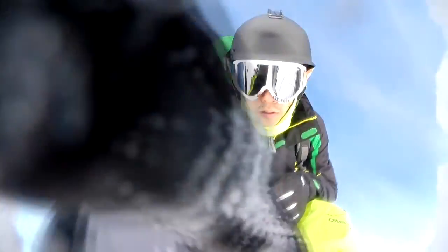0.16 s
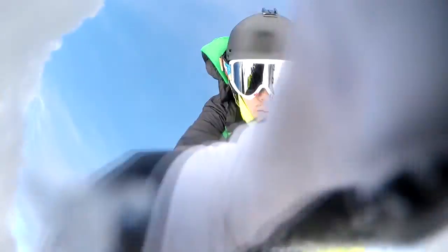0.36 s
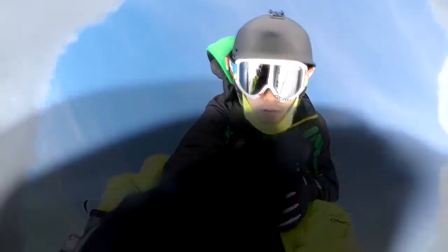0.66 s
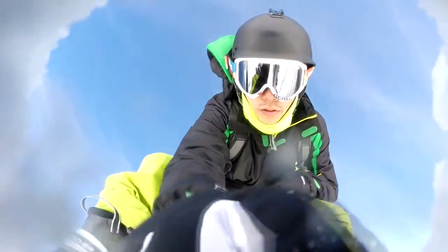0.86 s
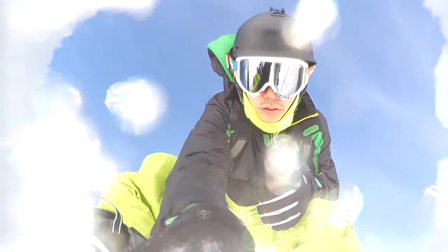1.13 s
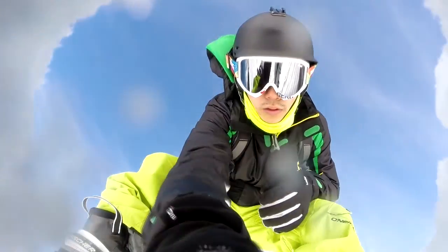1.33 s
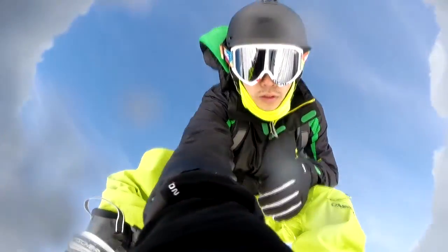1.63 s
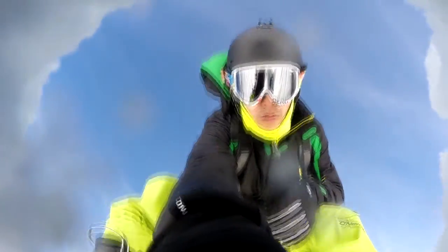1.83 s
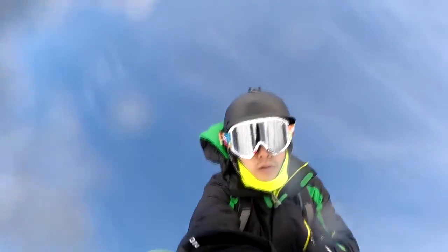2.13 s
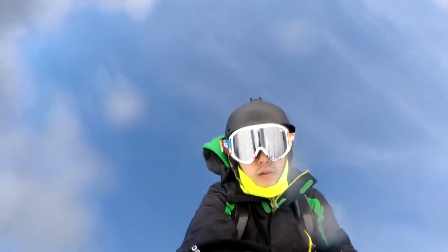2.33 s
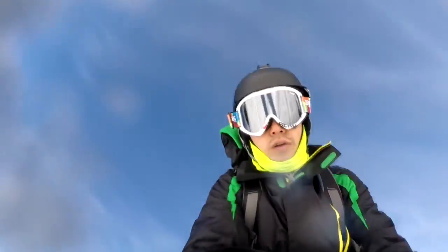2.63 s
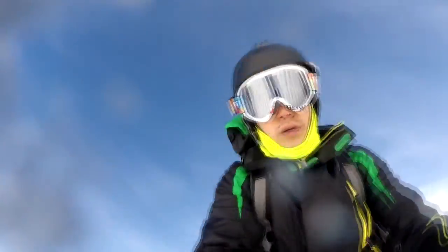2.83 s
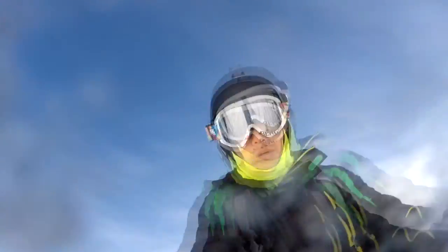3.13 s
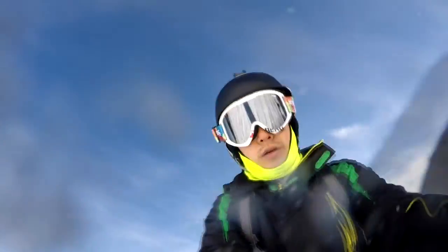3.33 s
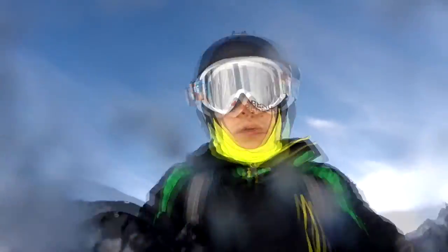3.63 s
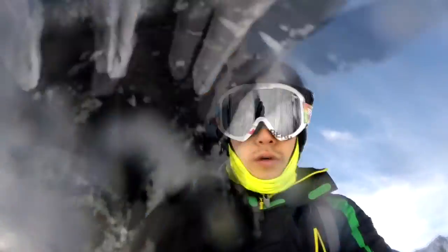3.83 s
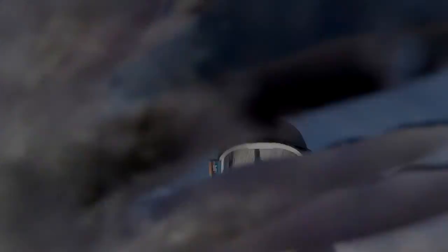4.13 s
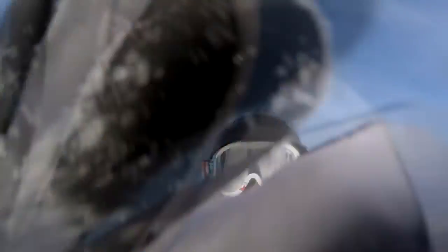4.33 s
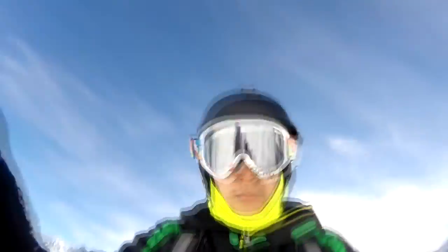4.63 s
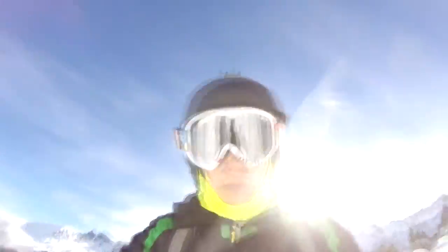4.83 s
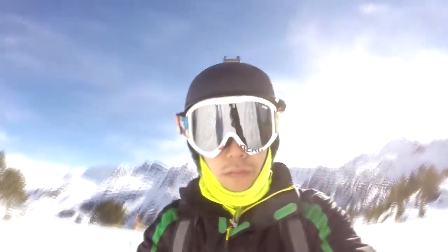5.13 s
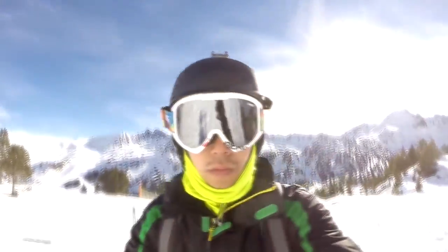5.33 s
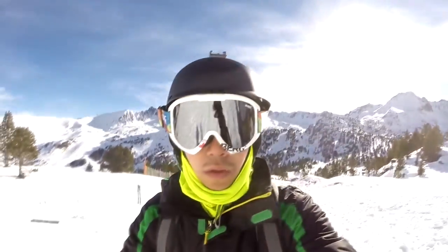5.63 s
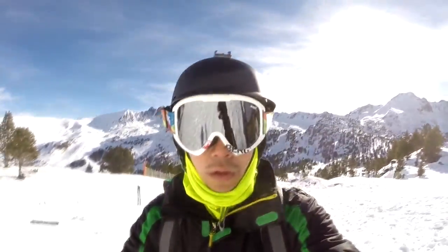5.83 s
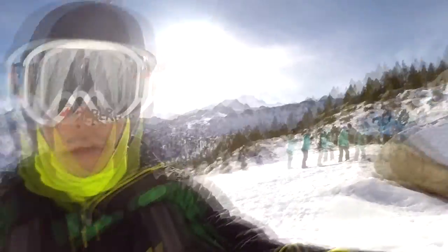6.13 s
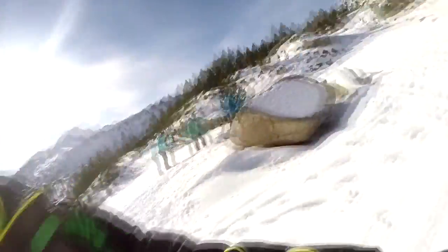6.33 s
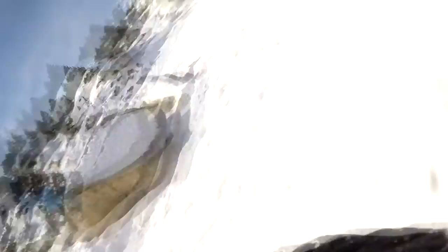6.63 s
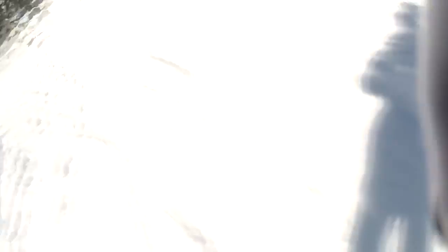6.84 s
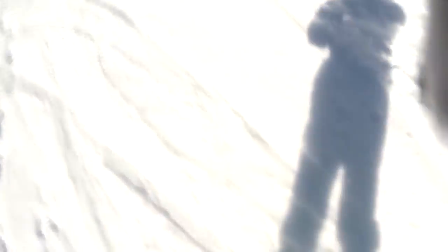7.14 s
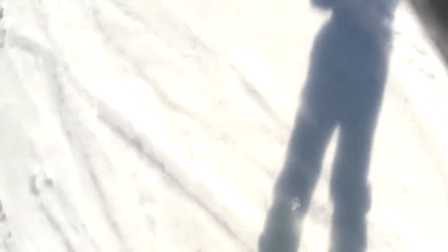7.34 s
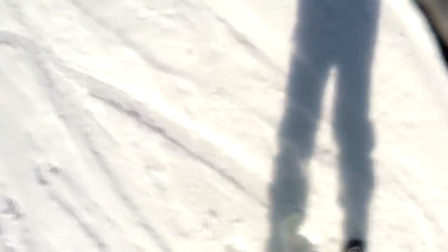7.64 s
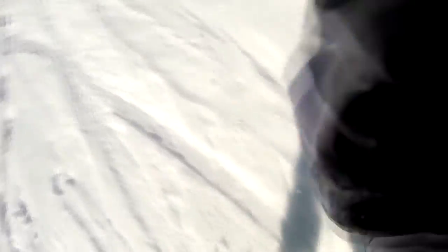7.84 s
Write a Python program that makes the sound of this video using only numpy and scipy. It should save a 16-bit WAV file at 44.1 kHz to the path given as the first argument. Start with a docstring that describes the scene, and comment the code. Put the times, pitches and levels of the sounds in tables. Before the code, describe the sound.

A microphone sealed in a plastic housing picks up a gloved hand very closely on a still, snowy slope. From 0 to 1.1 s short, rough wipes scrape and crunch over icy grains, with snaps, dull knocks, low bumps and tiny squeaks around 0.6 s. After a brief easing, a heavy thump and more strokes come at 1.5 s, running to about 2.1 s and ending in bright ticks. A lull follows; at 2.5-2.9 s the mount creaks in small slipping pulses. Crisp scraping resumes from 2.9 s, growing knockier and more cracking, with deep bumps between 3.7 and 4.9 s. Near 5 s it falls almost silent, just faint air and a thin wavering whine, then a slight swell. From 5.9 s snaps and scrapes return; after 6.6 s the case rings hollowly, with sharp strokes near 7.2-7.4 s and strong final scrapes around 7.8 s, over low arm-swing rumble.

```python
"""A skier wipes snow off a camera in a plastic housing with a glove, lifts it, then turns it round in the hand.
Rough strokes scrape from the start, shaped noise over snow-like grains, among ringing ice snaps, bumps and squeaks.
After a lull near 2.3 s slipping pulses creak, the strokes return, and a second lull near 5 s ends in a faint swell.
From about 6 s the last strokes scrape, and the case modes ring more freely.
Low noise rumbles with the swinging arm; faint air noise and two thin wavering tones lie beneath."""
import sys
import numpy as np
from scipy import signal
from scipy.fft import rfft, irfft, next_fast_len
from scipy.io import wavfile
from scipy.ndimage import uniform_filter1d, map_coordinates

SR = 44100
rng = np.random.default_rng(int(sys.argv[2]) if len(sys.argv) > 2 else 0)


def to_wav(sig):
    """Store sig (one row per channel, or 1-D mono) as 16-bit WAV at the path in sys.argv[1].

    Samples outside -1..1 are clipped; the rate is SR.
    """
    pcm = np.clip(np.atleast_2d(sig), -1, 1) * 32767
    pcm = np.round(pcm).astype(np.int16)
    wavfile.write(sys.argv[1], SR, pcm.T)  # frames by channels


N = 351477  # length in samples

# Colour of the housing's walls under scraping and crunching.
# Each row: frequency in Hz, relative level in dB.
WALL_COLOUR = [(450, -42.5), (800, -11), (1050, -11), (1350, 1.5), (1750, 1.5), (2100, 3), (2650, 0),
               (3400, -8.5), (4500, -38), (7000, -38.5)]
# Colour of the bright ice hiss and the cracks.
# Each row: frequency in Hz, relative level in dB.
ICE_COLOUR = [(1800, -35), (3000, -2), (3800, 1), (4900, -1), (5900, 2), (7500, -8.5), (8600, -8.5),
              (9800, -10.5), (11500, -15.5), (15000, -25)]


def amp(db):
    """Decibels to gain."""
    return 10 ** (np.asarray(db) / 20)


def unit(x):
    """Scale to rms 1."""
    return x / np.sqrt(np.mean(x ** 2) + 1e-20)


def curves(rows):
    """One value per sample for each column after the time."""
    s, *cols = np.transpose(rows)
    return [np.interp(np.arange(N) / SR, s, c) for c in cols]


def wobble(rate):
    """A smooth random curve, rate knots a second."""
    knots = rng.standard_normal(int(N * rate / SR) + 4)
    return map_coordinates(knots, [np.arange(N) * rate / SR], mode="nearest")


def coloured(x, points):
    """x through a causal minimum-phase filter of power gain 1 with the (Hz, dB) shape."""
    m = 2 * next_fast_len(N // 2 + SR // 8)
    hz, db = np.transpose(points)
    bin_hz = np.fft.rfftfreq(m, 1 / SR)
    gain = unit(amp(np.interp(np.log(bin_hz + 1), np.log(hz), db)))
    # folding the cepstrum onto positive time makes the filter causal
    cepstrum = irfft(np.log(gain))
    cepstrum[1:m // 2] *= 2
    cepstrum[m // 2 + 1:] = 0
    return irfft(rfft(x, m) * np.exp(rfft(cepstrum)))[:N]


def add(track, s, sound):
    """Mix a sound into the track from time s."""
    start = max(0, round(s * SR))
    part = track[start:start + len(sound)]
    part += sound[:len(part)]


def touch_db(start, end, land, lift):
    """0 dB from start to end, falling away before and after at the given dB a second."""
    t = np.arange(N) / SR
    return np.clip(np.minimum(land * (t - start), lift * (end - t)), -150, 0)


def press_db(s, rise, fall):
    """The level of one stroke, as of a glove that lands, bears down, eases off and lifts."""
    swell_db, ease_db = 10.5, 8.5  # gained over the rise, lost over the fall
    land_db_per_s, lift_db_per_s = 5003.5, 1798.5
    t = np.arange(N) / SR - s
    below_peak = swell_db * np.clip(-t / rise, 0, 1) + ease_db * np.clip(t / fall, 0, 1)
    return touch_db(s - rise, s + fall, land_db_per_s, lift_db_per_s) - below_peak


def handling():
    """All strokes and grips together: levels of scrape, hiss, rub and judder (dB), and favoured resonance (Hz)."""
    # Wipes of the glove, and one faint swell of background noise before 5.9 s.
    # Each row: loudest moment in seconds, rise in seconds, fall in seconds, scrape in dB,
    # then hiss, rub and judder in dB relative to the scrape, and the resonance favoured in Hz.
    strokes = [(0.071, 0.051, .01, -24, -6.5, 0.5, 1, 2290), (0.127, .04, 0.032, -39, -7.5, -10, 4, 2022),
               (0.27, .026, 0.011, -13, -12, -11.5, -10, 1868),
               (.345, 0.083, 0.034, -35.5, -4.5, -2, 10.5, 2030),
               (0.484, 0.027, 0.01, -20.5, -3, 0.5, 0.5, 2230), (.525, 0.011, .02, -33, -9, -1, 3.5, 2200),
               (0.631, 0.036, .025, -26.5, -12, -8, 6, 1940),
               (0.658, .006, 0.0034, -32, -28, 15, 2.5, 1778),
               (0.723, 0.016, 0.0046, -16.5, -6.5, -5, 3, 1694),
               (0.761, 0.026, .025, -43, -4.5, 10.5, 17, 1836), (.825, .016, .006, -33, -10, -2, 6.5, 1782),
               (0.859, .03, .018, -19, -13, -9, 3, 1756), (0.898, 0.022, .015, -35.5, -6, 1, 15.5, 1800),
               (0.981, .055, 0.013, -31.5, -7, -1.5, -2, 1820),
               (1.084, 0.033, 0.0087, -32, -8.5, 0.5, 6.5, 1840),
               (1.375, .01, .03, -50, -22, -9, -16, 2235), (1.48, 0.072, .012, -65.5, -14.5, 18, -1, 1192),
               (1.555, 0.054, 0.028, -19, -8, -3, -2.5, 1980), (1.594, .006, .01, -21, -12, -5.5, 6, 1750),
               (1.706, 0.033, .03, -28, -7, -0.5, 9.5, 1980),
               (1.83, 0.08, 0.067, -24.5, -14.5, -8, -0.5, 2094),
               (1.96, .085, 0.057, -20.5, -7.5, -13.5, -22, 2080),
               (2.051, .006, 0.057, -29, -12, -28.5, -31, 3400), (2.841, 0.027, .02, -51, -18, 5, 3, 1935),
               (2.902, 0.036, 0.0096, -25, -9, -14, -23, 1924),
               (3.021, .055, 0.021, -21, -8, -16.5, -12, 1935),
               (3.114, 0.062, 0.021, -17, -6, -22.5, -17, 2070),
               (3.168, 0.059, 0.046, -23, -6.5, -17, -3.5, 2103),
               (3.254, 0.021, 0.022, -28, -12, -36, -35, 2232),
               (3.326, 0.0096, 0.025, -34, -7.5, -30, -31, 2173),
               (3.395, .003, 0.063, -23.5, 2.5, -12, -7, 4260),
               (3.465, 0.027, .045, -20.5, -8, -11, -8.5, 2060),
               (3.56, 0.075, 0.11, -34.5, -7.5, -3.5, -13.5, 2018),
               (3.73, 0.048, 0.025, -20.5, -6.5, -2.5, -8, 1750),
               (3.788, 0.012, 0.025, -28.5, -2.5, -4.5, 2.5, 1817),
               (3.932, 0.0083, .02, -17, 4, -11.5, -6, 1508),
               (3.975, 0.025, 0.0094, -19.5, -1.5, -4, -1, 1560),
               (4.18, .003, .012, -28.5, -8, -4, 5.5, 2100), (4.208, .016, 0.014, -23, 1, -5.5, -0.5, 3870),
               (4.24, .015, 0.0091, -20.5, -10, -5.5, 1.5, 1556),
               (4.301, 0.049, 0.073, -55.5, -1.5, -16.5, -19.5, 1715),
               (4.409, .002, .012, -33, -8, 7, 12.5, 1750), (4.457, .04, 0.007, -21, -8.5, -4.5, 3.5, 1720),
               (4.662, 0.05, 0.016, -22.5, -7.5, -2.5, 6.5, 1837),
               (4.69, .01, 0.03, -38.5, -5.5, -5, -2, 1970),
               (4.823, .002, 0.014, -28.5, -7.5, 6.5, -0.5, 2286),
               (4.852, 0.0023, 0.0033, -17, -15.5, 7, 7, 2485),
               (4.94, .07, .06, -53, -10.5, -3.5, -12.5, 1948), (5.86, .35, .06, -69, 4, 7, 5, 1800),
               (5.965, .015, 0.0099, -28.5, -14.5, 3.5, 4.5, 2073),
               (6.044, 0.12, 0.094, -23, -12.5, -12, -9, 2395),
               (6.188, 0.016, 0.017, -29.5, -6.5, -8, -5, 2380),
               (6.23, 0.022, .035, -31, -12, -10, -13, 2176),
               (6.328, 0.011, 0.015, -20, -6.5, -11, -2.5, 2270),
               (6.47, .11, 0.11, -24.5, -5, -11.5, -4, 2050), (6.631, .03, 0.024, -33.5, -12, -2, 10, 2014),
               (6.743, .055, 0.068, -24, -10, -6, -6, 2090), (6.848, .04, 0.15, -34, -8.5, -8, -7, 1966),
               (7.213, 0.022, .02, -20.5, -8, -17, -15, 1966),
               (7.289, 0.069, 0.075, -28, -2, -6.5, -2.5, 1744),
               (7.415, .012, 0.017, -20, -5.5, 2.5, -9.5, 1502),
               (7.44, 0.013, .022, -22.5, -8.5, 2, -0.5, 1302),
               (7.519, 0.11, 0.28, -35.5, -5.5, -9.5, -4.5, 1910),
               (7.825, 0.06, 0.03, -15.5, -8.5, -17, -19.5, 2080),
               (7.872, .012, 0.014, -14, -17, -12.5, -11.5, 2150),
               (7.91, .02, .03, -28.5, -16, -14, -7, 1996), (7.96, .015, .02, -30, 0, -17, -16, 4460)]
    # The glove resting on the case and creeping between wipes.
    # Each row: start in seconds, end in seconds, levels of scrape, hiss, rub and judder in dB.
    grips = [(0, 0.162, -50, -57, -47, -41), (0.219, 1.027, -46.5, -54.5, -50, -46),
             (1.307, 1.493, -59.5, -78, -55, -72), (1.496, 1.722, -49, -52.5, -52, -44),
             (1.717, 2.121, -37, -42.5, -59, -65), (2.536, 2.843, -65, -71, -63, -64),
             (2.837, 3.389, -49, -54.5, -56, -56), (3.39, 4.25, -51, -59.5, -52.5, -55),
             (4.612, 4.715, -51.5, -57, -56, -48.5), (4.714, 4.821, -62.5, -74, -62.5, -72.5),
             (5.918, 6.326, -41.5, -56, -56, -47.5), (6.33, 6.67, -34.5, -42.5, -42.5, -41.5),
             (6.697, 7.975, -38, -45.5, -47.5, -45)]
    # Nothing sliding on the case: levels of scrape, hiss, rub and judder in dB.
    idle = (-81, -82.5, -81, -74.5)
    grip_db_per_s = 899.5  # a grip closes and loosens more gently than a wipe

    power = amp(idle)[:, None] ** 2 * np.ones(N)
    for start, end, *grip_db in grips:
        grip = amp(touch_db(start, end, grip_db_per_s, grip_db_per_s)) ** 2
        power += np.outer(amp(grip_db) ** 2, grip)
    weight, weighted_hz = np.zeros((2, N))
    for s, rise, fall, db, hiss_db, rub_db, judder_db, hz in strokes:
        stroke = amp(db + press_db(s, rise, fall)) ** 2
        power += np.outer(amp([0, hiss_db, rub_db, judder_db]) ** 2, stroke)
        weight += stroke
        weighted_hz += hz * stroke
    return 10 * np.log10(power), weighted_hz / weight


def grains(rate, spread_db):
    """Tiny fractures at random moments, of scattered sizes; the power is the same at every rate."""
    sizes = amp(spread_db * np.clip(rng.standard_normal(N), -2, 2)) * rng.choice([-1, 1], N)
    breaks = rng.random(N) < rate / SR
    return unit(sizes * breaks / np.sqrt(rate))


def shifting(x, contact_hz, depth_db, lift_db):
    """The colour drifts in patches, and one resonance stands out, as the contact moves over the case."""
    hz, s, z = signal.stft(x, SR, nperseg=256)
    patches = rng.standard_normal(z.shape)
    for _ in range(2):
        patches = uniform_filter1d(patches, 5, axis=0)  # over frequency
        patches = uniform_filter1d(patches, 9, axis=1)  # over time
    resonance_hz = np.interp(s, np.arange(N) / SR, contact_hz)
    octaves = np.log2((hz[:, None] + 1) / resonance_hz)
    db = depth_db * unit(patches) + lift_db * np.exp(-(octaves / 0.38) ** 2)
    return signal.istft(z * amp(db), nperseg=256)[1][:N]


def padded(x):
    """The hollow between glove and case adds a low resonance that moves as the grip changes."""
    # Each row: time in seconds, resonance in Hz.
    hollow = [(0, 257.3), (.55, 298.4), (.66, 496), (.75, 280), (1.1, 279.4), (1.47, 623), (1.6, 321),
              (2.85, 299.5), (3.3, 708), (4.15, 848), (4.85, 619), (6.1, 593), (6.8, 304.3), (7.42, 444)]
    width_hz, gain = 170, 0.71
    # shift the moving resonance down to 0 Hz, smooth there, and shift it back
    turn = np.exp(2j * np.pi * np.cumsum(curves(hollow)[0]) / SR)
    keep = np.exp(-np.pi * width_hz / SR)
    boom = turn * signal.lfilter([1 - keep], [1, -keep], x / turn)
    return x + gain * 2 * np.real(boom)


def scraping(levels_db, contact_hz):
    """Snow crystals catch and slip in clumps under the glove and shake the housing."""
    # Dull rub of the glove. Each row: frequency in Hz, relative level in dB.
    rub_colour = [(90, -28.5), (170, 1), (280, -0.5), (370, -4.5), (450, -4.5), (560, -8.5), (700, -9),
                  (880, -7), (1400, -13), (3000, -73)]
    # Shudder of the dragged case. Each row: frequency in Hz, relative level in dB.
    judder_colour = [(25, -17.5), (50, -1.5), (80, 0), (130, -5), (190, -10.5), (300, -29.5), (600, -67.5)]
    clump_db, catch = 1.5, 0.077  # unevenness, and its growth per dB of judder as the glove catches

    scrape_db, hiss_db, rub_db, judder_db = levels_db
    catching = 1 + catch * np.clip(judder_db - scrape_db + 8.5, -12, 12)
    clumps = amp(clump_db * catching * (0.95 * wobble(rate=200) + 0.23 * wobble(rate=88)))
    # a light touch breaks single crystals; a hard stroke breaks so many that they merge
    crunch = grains(rate=1700 * amp(.5 * (np.maximum(scrape_db, -62) + 20)), spread_db=4.5)
    # the lightest touch breaks none and only whispers
    bite = np.interp(scrape_db, [-73, -60], [0, 1])

    def friction(smooth):
        """Breaking crystals over smooth noise, both gathered in clumps."""
        whisper = (smooth + 0.18 * (1 - bite)) * rng.standard_normal(N)
        return clumps * (bite * crunch + whisper)

    scrape = shifting(friction(smooth=0.9), contact_hz, depth_db=2.5, lift_db=2.5)
    scrape = amp(scrape_db) * unit(coloured(scrape, WALL_COLOUR))
    hiss = shifting(friction(smooth=0.76), contact_hz, depth_db=1.5, lift_db=7)
    hiss = amp(hiss_db - 1.6) * unit(coloured(hiss, ICE_COLOUR))
    rub = amp(rub_db - 0.6) * unit(padded(coloured(friction(smooth=.8), rub_colour)))
    # the soft glove drags the whole case to and fro
    judder = amp(judder_db + 1.62) * unit(coloured(rng.standard_normal(N), judder_colour))
    return scrape + hiss + rub + judder


def snapping():
    """Each snap rings the damped wall for a few cycles, with a rough crunch, a bright crack and a dull knock."""
    # Crumbs of ice breaking and the case ticking, levels before each layer's trim and filter.
    # Each row: time in seconds, ring in dB, ring frequency in Hz, crack in dB, knock in dB.
    snaps = [(0.0393, -22, 1490, -46, -8.5), (0.071, -8, 2400, -21, -9), (0.2384, -20, 2120, -38, -28),
             (0.2479, -13, 1740, -45, -41), (0.332, -24, 1670, -42, -17), (0.4875, -8.5, 3480, -15.5, -37),
             (0.7221, -32, 2180, -17.5, -7.5), (.854, -7, 1790, -29, -31), (0.862, -7.5, 1790, -22.5, -11),
             (.938, -27, 3000, -30, -36), (0.951, -21.5, 2380, -40, -20), (1.0557, -21.5, 2130, -46.5, -26),
             (1.1345, -47.5, 2400, -60, -83.5), (1.3133, -35, 2250, -77, -30.5),
             (1.3697, -28.5, 2160, -74, -42), (1.591, -7, 1620, -29, -12), (1.5968, -18, 1830, -33, -17),
             (1.7318, -12.5, 1880, -33, -10.5), (1.8414, -5, 2240, -15, -11.5),
             (2.0468, -10, 3370, -31, -38), (2.094, -15, 3220, -28, -57), (2.1066, -13, 2140, -23.5, -45.5),
             (2.1125, -4.5, 2020, -31, -35), (2.372, -45, 1820, -67.5, -70),
             (2.8013, -31, 2250, -45.5, -53), (3.031, -17, 2370, -22, -56), (3.151, -17, 2040, -27, -29),
             (3.1856, -6, 2240, -17, -48), (3.1892, -10, 3670, -17, -34), (3.4648, -8, 2040, -32, -17),
             (3.5042, -11, 2870, -16.5, -34), (3.854, -32.5, 2610, -40, -58), (3.9297, -6, 1390, -27, -38),
             (3.9332, -9, 1600, -34, -23), (3.954, -13.5, 1580, -35.5, -19), (3.9696, -3.5, 1380, -29, -36),
             (3.986, -14.5, 1383, -27.5, -14), (4.03, -31.5, 3580, -42, -62),
             (4.062, -19, 2840, -30.5, -24), (4.179, -19, 2230, -30.5, -25), (4.234, -11, 1610, -28, -40),
             (4.238, -10.5, 1800, -32, -16), (4.2967, -43, 2140, -69.5, -57),
             (4.4588, -9.5, 1830, -28.5, -16.5), (4.4954, -44, 1480, -78, -50.5),
             (4.5774, -43.5, 2110, -74, -56.5), (4.6681, -5, 1560, -40.5, -20.5),
             (4.8206, -16, 1450, -26, -12.5), (4.8529, -3.5, 2570, -12.5, -10.5),
             (4.8747, -22.5, 2280, -38, -18), (4.944, -34, 3600, -40.5, -48), (4.978, -41, 1580, -64, -54),
             (5.003, -40, 1550, -71, -50), (5.0369, -50.5, 2527, -63.5, -72), (5.882, -8.5, 1793, -54, -26),
             (5.923, -14, 2110, -29.5, -14.5), (5.9622, -11, 1280, -25.5, -16),
             (6.1069, 0.5, 2750, -15, -5.5), (6.1152, -1, 2590, -18, -14), (6.3207, -7, 2200, -22, -43),
             (6.333, -7, 2420, -36, -12), (6.415, -12, 2030, -29, -36), (6.494, -9, 1930, -46, -22),
             (6.6699, -18.5, 4100, -28, -17.5), (6.7567, -8.5, 2270, -24, -35),
             (6.7993, -37, 3220, -14, -10), (7.0396, -27, 2240, -49, -47), (7.2142, -22, 1830, -40, -8.5),
             (7.3286, -12.5, 4480, -22, -15), (7.289, -26, 2240, -23, -14), (7.342, -10.5, 1530, -44, -7.5),
             (7.3905, -37, 3140, -16, -9), (7.4127, -6, 1800, -19.5, -10), (7.4977, -15, 2430, -20.5, -14),
             (7.692, -15, 1750, -44, -22), (7.829, -5, 2130, -22, -13), (7.8417, -7, 1910, -36, -8.5),
             (7.8961, -6, 2120, -49, -29)]
    rise_s, growth = 0.00033, .2  # peak time of a -14 dB ring; dB of time per dB, as bigger crumbs take longer
    # bits that break around a snap, relative to it: their decay after and build-up before
    crumble_db, crumble_s, strain_s = -16, 0.0039, 0.0018

    ring, crunch, crack, knock = np.zeros((4, N))
    t = np.arange(-SR // 60, SR // 30) / SR
    crumble = amp(crumble_db) * np.exp(-np.maximum(t / crumble_s, -t / strain_s))
    for s, ring_db, hz, crack_db, knock_db in snaps:
        u = np.maximum(t, 0) / (rise_s * amp(growth * max(ring_db + 14, -5)))
        shape = u * np.exp(1 - u)
        drift, rough, bright = rng.standard_normal((3, len(t)))
        phase = 2 * np.pi * hz * t + .02 * np.cumsum(drift)  # the crumb shifts as it breaks
        add(ring, s + t[0], amp(ring_db + 3.5) * shape * np.sin(phase))
        add(crunch, s + t[0], amp(ring_db - 6.5) * (shape + crumble) * rough)
        add(crack, s + t[0], amp(crack_db + 2.5) * (shape + crumble) * bright)
        add(knock, s + t[0], amp(knock_db + 1.0) * shape * np.sin(2 * np.pi * 260 * t))
    stiff_wall = signal.butter(4, 1100, "high", fs=SR, output="sos")
    wall_ring = signal.sosfilt(stiff_wall, ring)
    return wall_ring + coloured(crunch, WALL_COLOUR) + coloured(crack, ICE_COLOUR) + knock


def ringing(contact):
    """Where case and mount are free, the contact sounds keep their modes sounding a moment longer."""
    # The case's own modes. Each row: frequency in Hz, level in dB, 60 dB decay time in seconds.
    case_modes = [(880, -8.5, .3), (1190, -13.5, 0.27), (1580, -17.5, 0.16), (1970, -11, 0.36),
                  (4774, -12, 0.25), (6000, -4, 0.082), (7110, -12, .07)]
    # The mount's one faint mode: frequency in Hz, level in dB, 60 dB decay time in seconds.
    mount_mode = (427, -5, 0.18)
    # How freely they ring, as snow and glove damp them or let go.
    # Each row: time in seconds, drive to the case in dB, drive to the mount in dB.
    freedom = [(0, -23, -12.5), (3.401, -15, -18.5), (3.9, -6, -16), (4.46, -10, -27.5), (4.6, -20, -25.5),
               (6.2, -16, -16.5), (6.6, 5, 0), (7.97, 6, 0)]

    t = np.arange(SR // 2) / SR
    out = np.zeros(N)
    for free_db, modes in zip(curves(freedom), (case_modes, [mount_mode])):
        tail = np.zeros(len(t))
        for hz, db, t60 in modes:
            decay = amp(-60 * t / t60)
            tail += amp(db) * 2 * decay / decay.sum() * np.cos(2 * np.pi * hz * t)
        out += signal.fftconvolve(amp(free_db) * contact, tail)[:N]
    return out


def bumping():
    """The hand bumps the case, which flexes in and springs back: one swing of pressure."""
    # Each row: time in seconds, level in dB before a 1 dB trim, rate of the swing in Hz.
    bumps = [(.082, -28, 111), (.431, -21, 160), (0.477, -23.5, 292), (.499, -12, 98), (0.726, -12, 120),
             (.845, -24, 293), (0.9, -12, 117), (1.528, -4, 68.5), (3.734, -7.5, 53.6), (4.193, -8.5, 43),
             (4.418, -13.5, 34.5), (4.636, -7.5, 31.7), (4.827, -4.5, 76), (4.856, -6, 198.3),
             (6.801, -6, 175), (7.395, -12, 114)]
    out = np.zeros(N)
    t = np.arange(-SR // 10, SR // 10) / SR
    for s, db, hz in bumps:
        u = 2 * np.pi * hz * t
        add(out, s + t[0], amp(db - 1.0) * u * np.exp((1 - u * u) / 2))
    return out


def squeaking():
    """The wet glove slips fast and evenly on the case: a short gliding tone with a weaker octave."""
    # Each row: start in seconds, length in seconds, start pitch in Hz, end pitch in Hz, level in dB.
    squeaks = [(0.57, 0.021, 3000, 3440, -34), (0.648, 0.03, 546, 490, -24)]
    out = np.zeros(N)
    for s, length, start_hz, end_hz, db in squeaks:
        size = int(length * SR)
        glide = 2 * np.pi * np.cumsum(np.linspace(start_hz, end_hz, size)) / SR
        phase = glide + 0.044 * np.cumsum(rng.standard_normal(size))  # rough pitch
        add(out, s, amp(db) * np.hanning(size) * (np.sin(phase) + 0.28 * np.sin(2 * phase)))
    return out


def creaking():
    """The strained mount sticks and slips at an uneven rate: each slip is a soft push and a brief ring."""
    # Each row: start in seconds, end in seconds, average slips a second, average level in dB.
    creaks = [(2.543, 2.629, 84, -36), (2.677, 2.71, 33, -33.5), (2.796, 2.874, 51, -30)]
    out = np.zeros(N)
    t = np.arange(SR // 60) / SR
    push = np.sin(2 * np.pi * 280 * t) * amp(-60 * t / 0.012)
    ring = 0.61 * np.sin(2 * np.pi * 1750 * t) * amp(-60 * t / 0.0081) * (1 - np.exp(-t / .0003))
    slip = push + ring
    for start, end, rate, db in creaks:
        for s in np.arange(start, end, 1 / rate):
            add(out, s + rng.normal(0, 0.0013), amp(db + rng.normal(0, 1.8)) * slip)
    return out


def rumbling(scrape_db):
    """Air and the arm's tremor push slowly on the microphone, more so when a wipe shoves the camera."""
    # The arm swinging the camera through the air.
    # Each row: time in seconds, rumble in dB before the push of the wipes.
    sway = [(0, -32.5), (.9, -26.5), (1.25, -61.5), (1.55, -31), (1.85, -37.5), (2.06, -53), (2.4, -38.5),
            (2.95, -31), (3.7, -30.5), (3.95, -27), (4.65, -25.5), (5.0, -43.5), (5.75, -47), (5.95, -28.5),
            (6.25, -42.5), (6.64, -32), (7.3, -30), (7.97, -32.5)]
    # Each row: frequency in Hz, relative level in dB.
    rumble_colour = [(8, 4.5), (18, 5), (35, 4.5), (50, -6.5), (70, -30.5), (120, -52), (300, -100)]
    shove, shove_s = 0.71, 0.085  # dB of rumble per dB of scraping; time over which the arm gives way
    sway_db, = curves(sway)
    effort_db = uniform_filter1d(np.clip(scrape_db + 37, -15, 15), int(shove_s * SR))
    rumble = unit(coloured(rng.standard_normal(N), rumble_colour))
    return amp(sway_db + shove * effort_db + 1) * rumble


def background():
    """Faint air over the still slope, as shaped noise, and the electronics' thin wavering whine, as sines."""
    # The still slope. Each row: frequency in Hz, relative level in dB.
    air_colour = [(60, -4.5), (130, -5), (350, -11.5), (750, -17), (2100, -16), (3800, -22), (6000, -25),
                  (10000, -31), (12500, -39.5), (15000, -51.5)]
    # The whine. Each row: frequency in Hz, rms level in dB before the waver.
    whine_tones = [(5696, -91), (11391, -94)]
    t = np.arange(N) / SR
    whine = np.zeros(N)
    for hz, db in whine_tones:
        waver = 1 + .5 * wobble(rate=90)
        whine += amp(db) * np.sqrt(2) * np.sin(2 * np.pi * hz * t) * waver
    air = amp(-71.0) * unit(coloured(rng.standard_normal(N), air_colour))
    return air + whine


def scene():
    """All the handling reaches the one microphone through the case."""
    levels_db, contact_hz = handling()
    contact = scraping(levels_db, contact_hz) + snapping() + creaking() + squeaking()
    movement = bumping() + rumbling(levels_db[0])
    return (contact + ringing(contact) + movement + background())[None]


def record(dry):
    """The camera rounds off the highest peaks and filters steeply above its band limit."""
    top_hz = 15600
    held = dry / (1 + np.abs(dry) ** 6) ** (1 / 6)
    band_limit = signal.ellip(10, .1, 90, top_hz, fs=SR, output="sos")
    return signal.sosfilt(band_limit, held)


dry = scene()
out = record(dry)
to_wav(out)
```